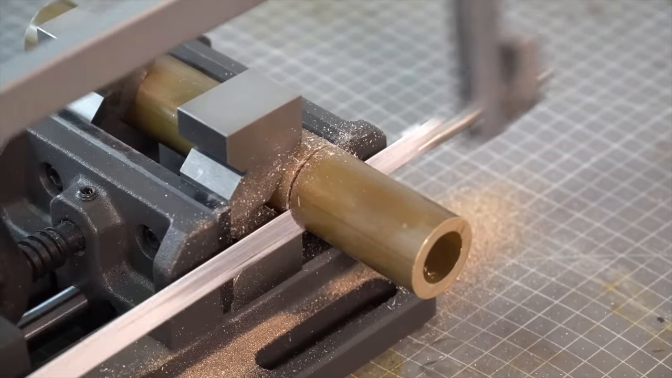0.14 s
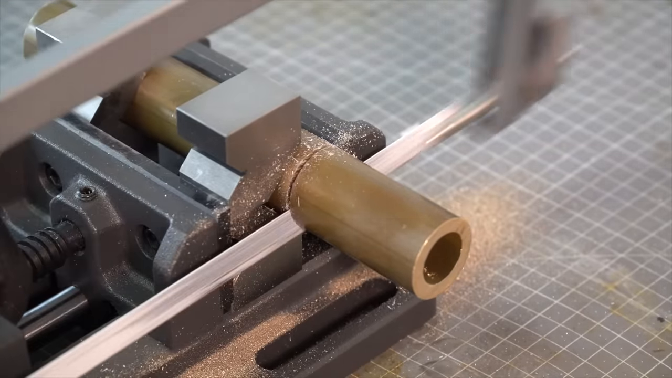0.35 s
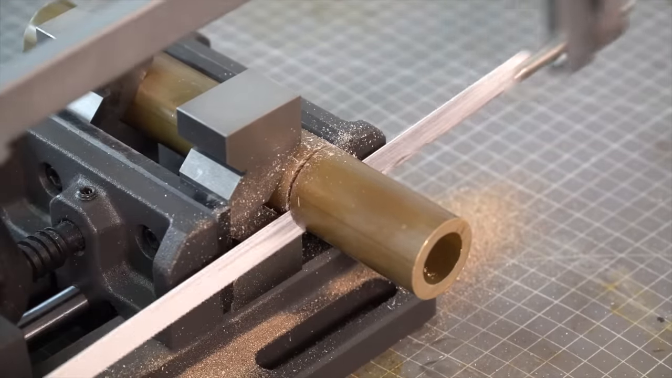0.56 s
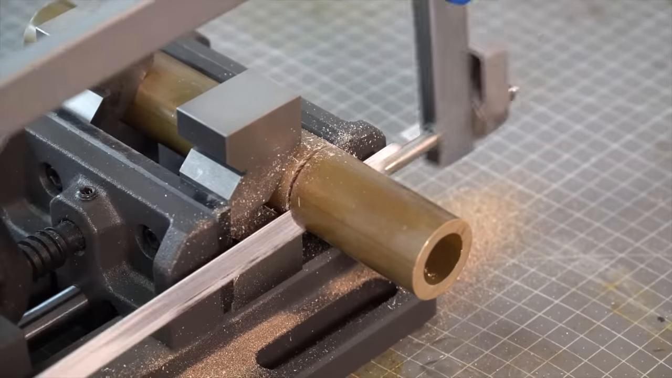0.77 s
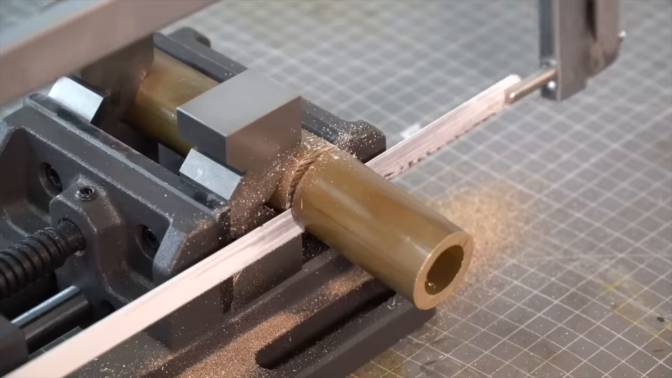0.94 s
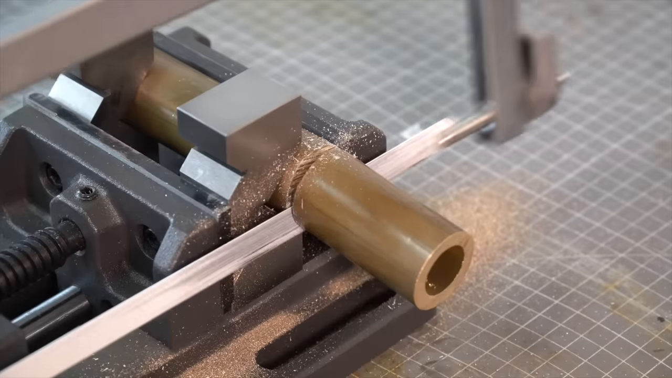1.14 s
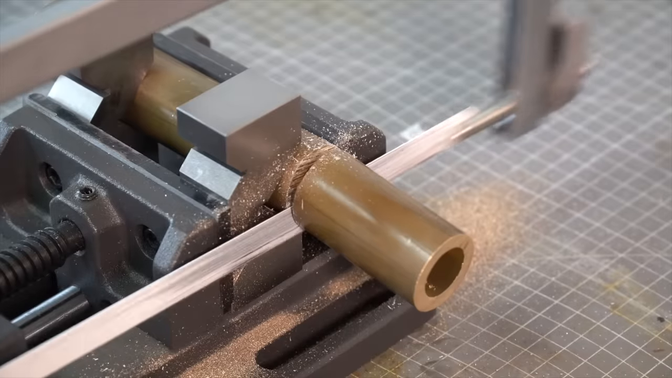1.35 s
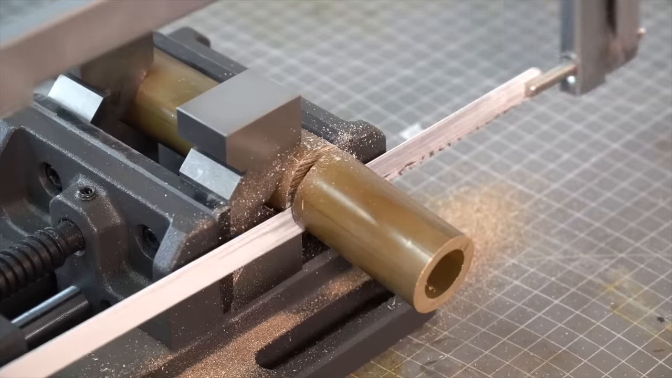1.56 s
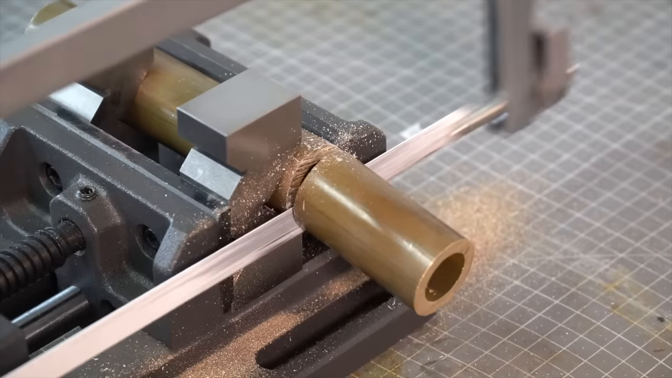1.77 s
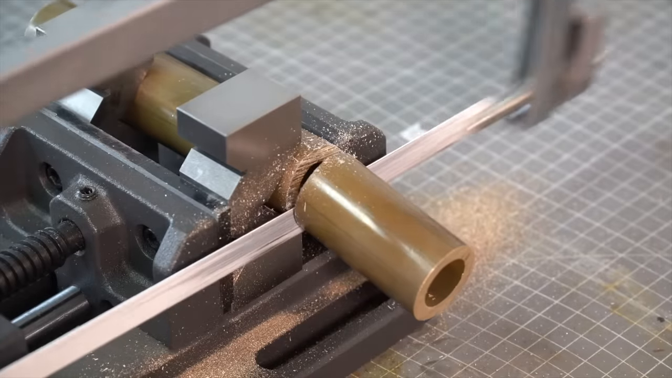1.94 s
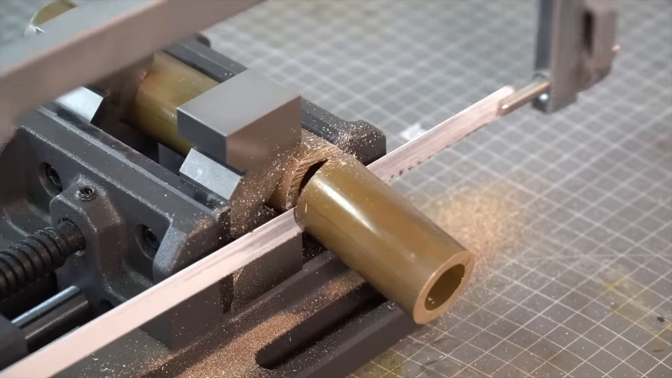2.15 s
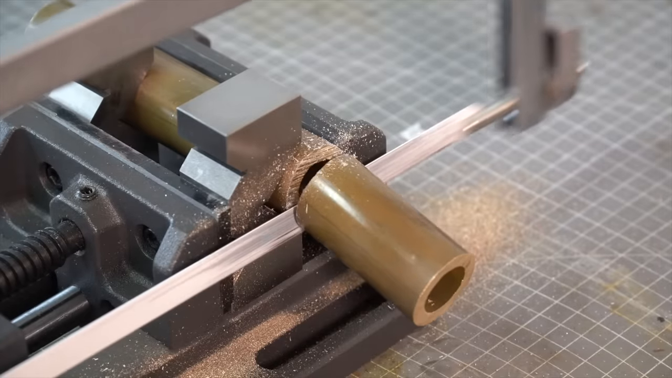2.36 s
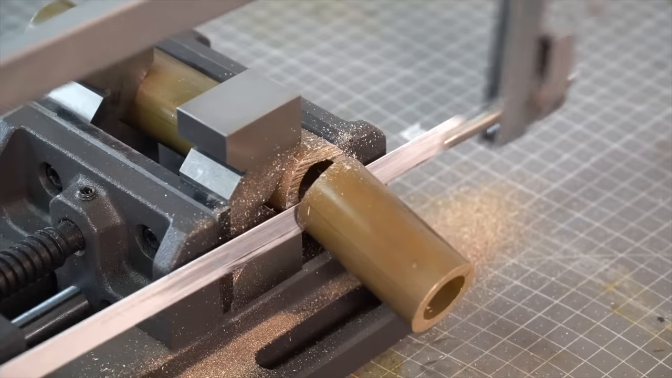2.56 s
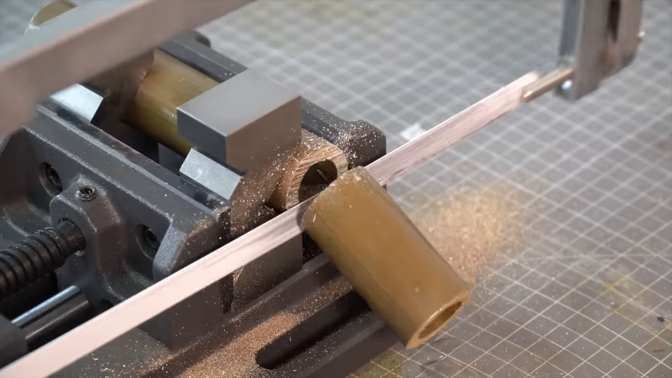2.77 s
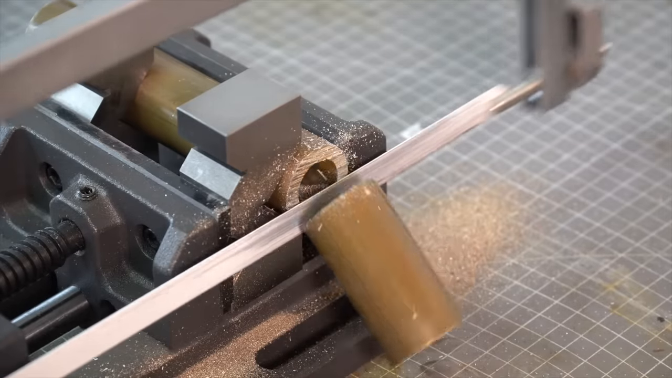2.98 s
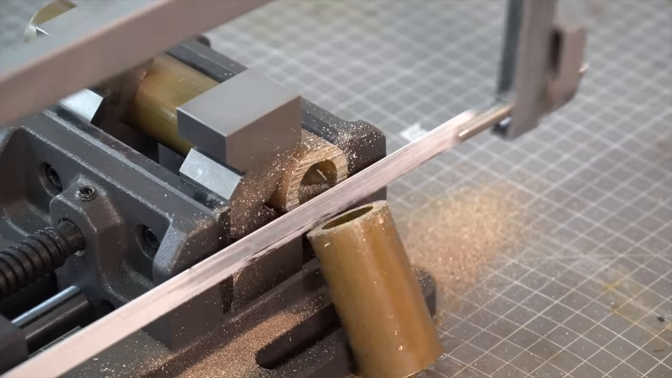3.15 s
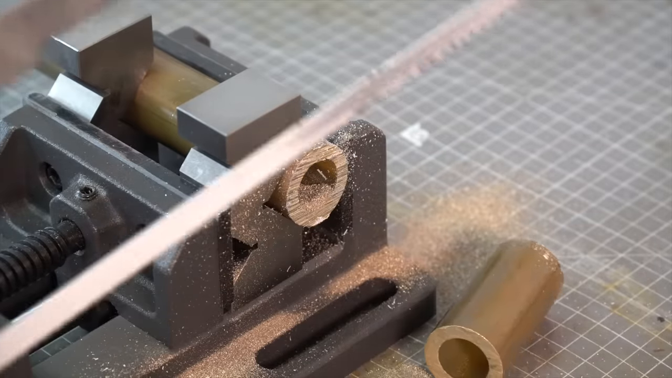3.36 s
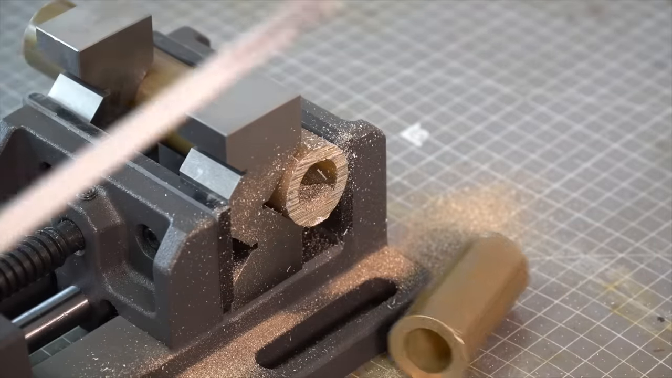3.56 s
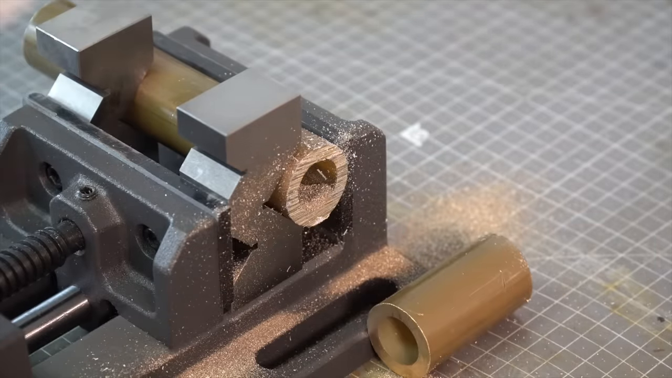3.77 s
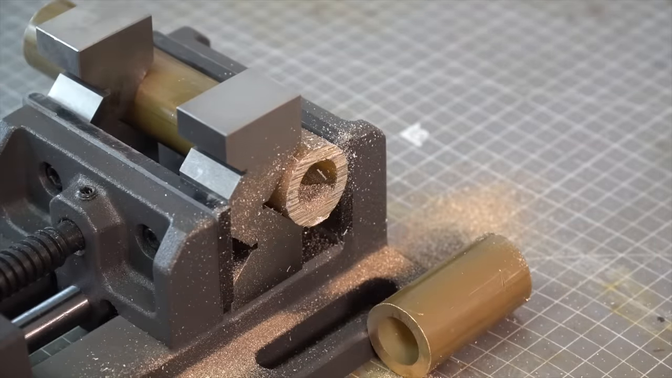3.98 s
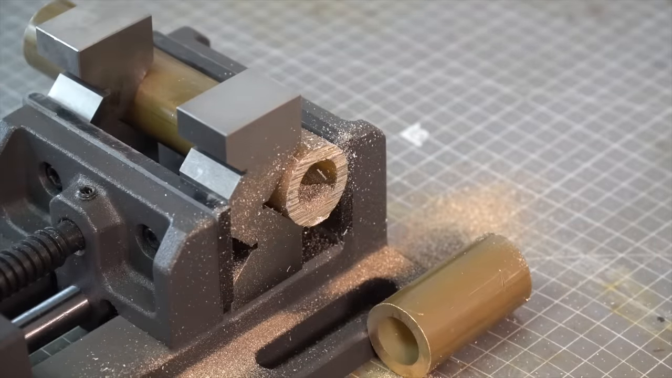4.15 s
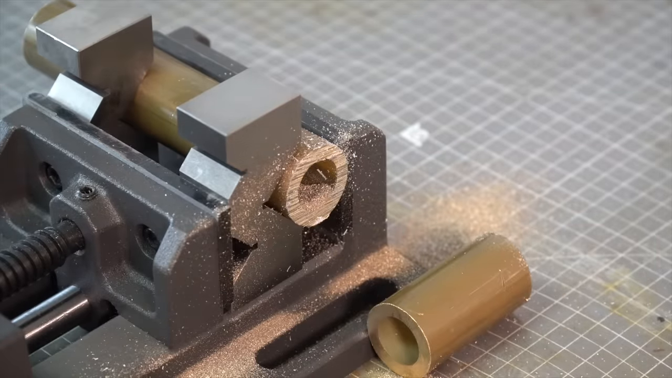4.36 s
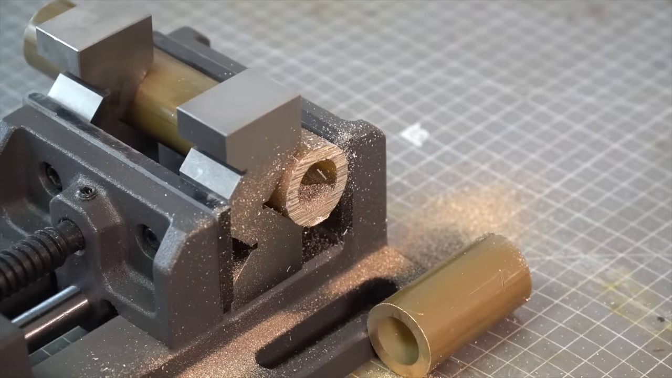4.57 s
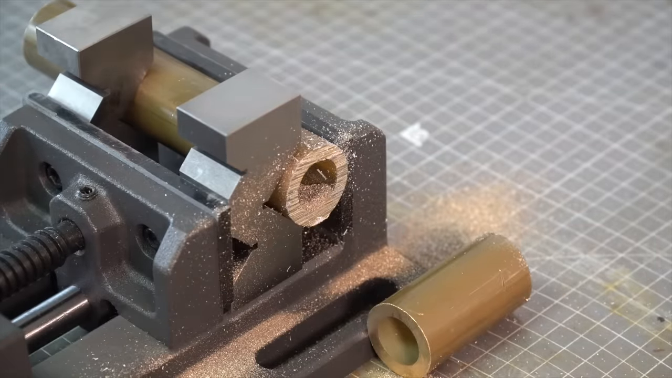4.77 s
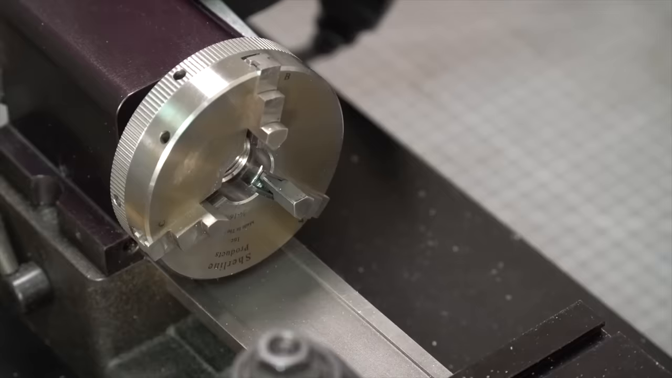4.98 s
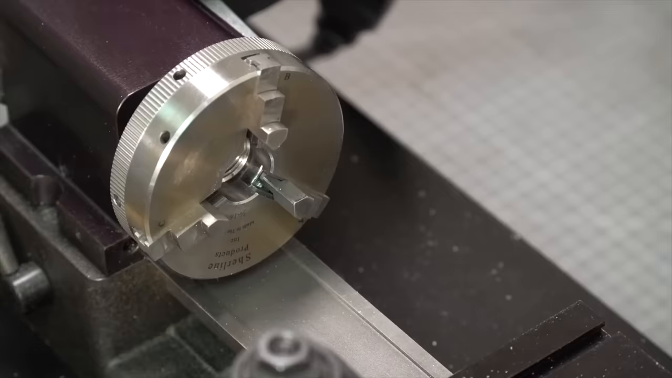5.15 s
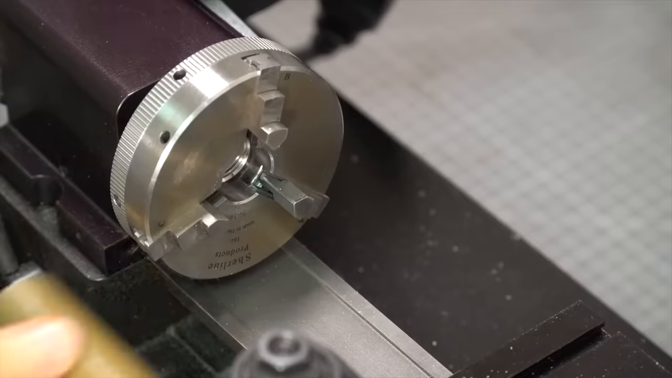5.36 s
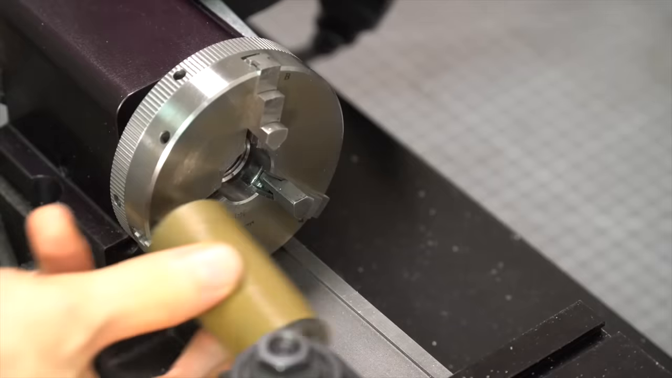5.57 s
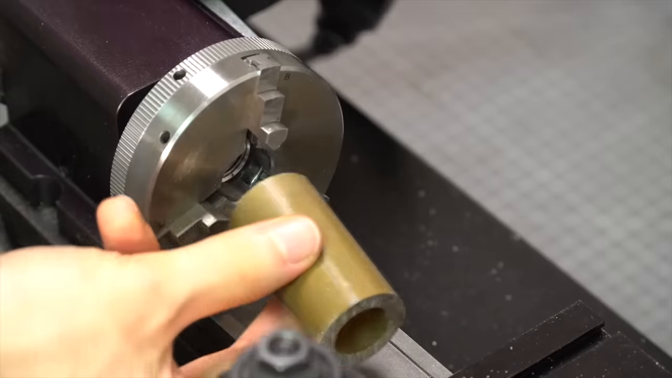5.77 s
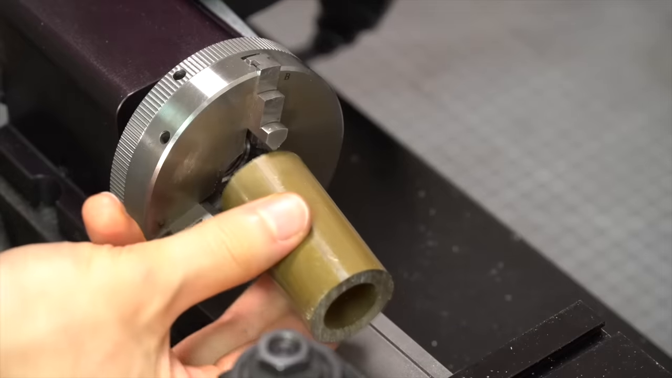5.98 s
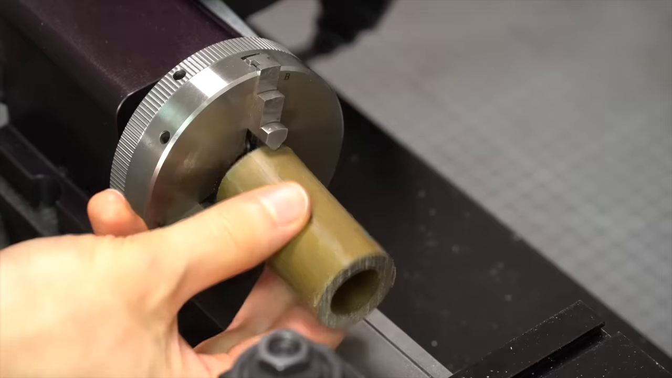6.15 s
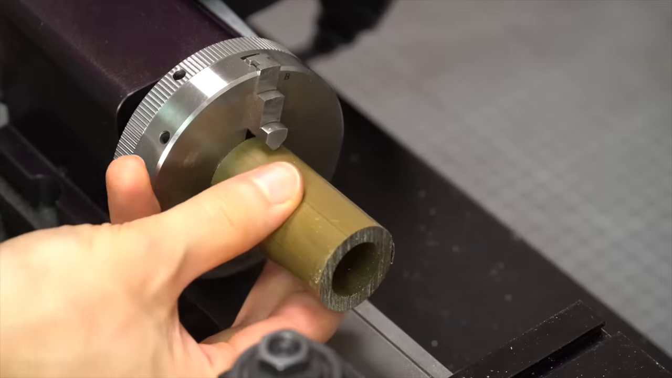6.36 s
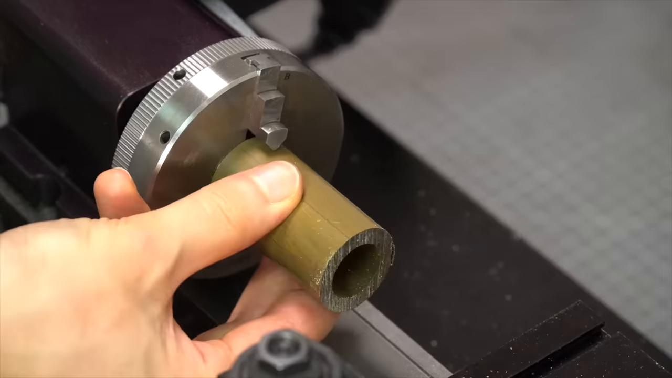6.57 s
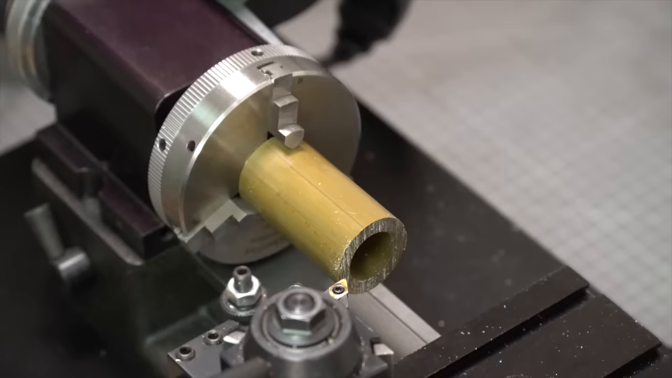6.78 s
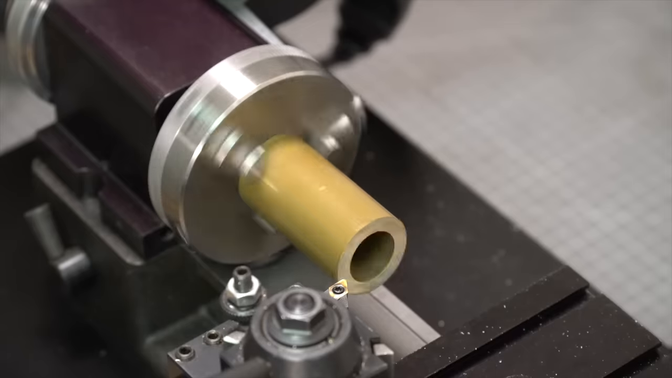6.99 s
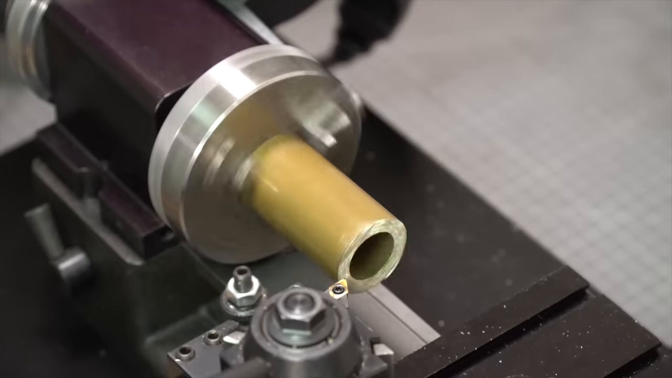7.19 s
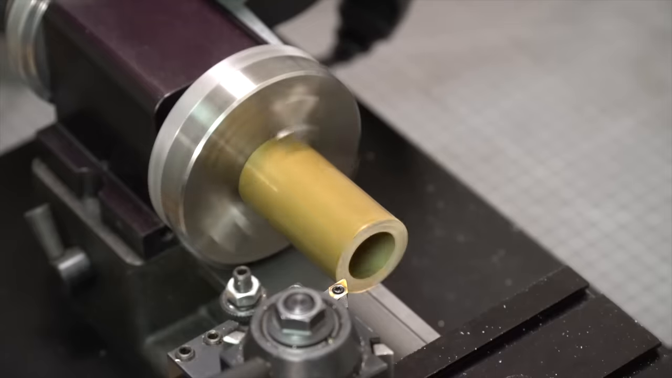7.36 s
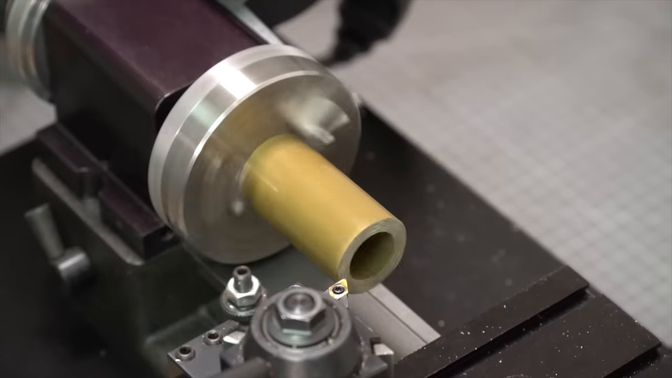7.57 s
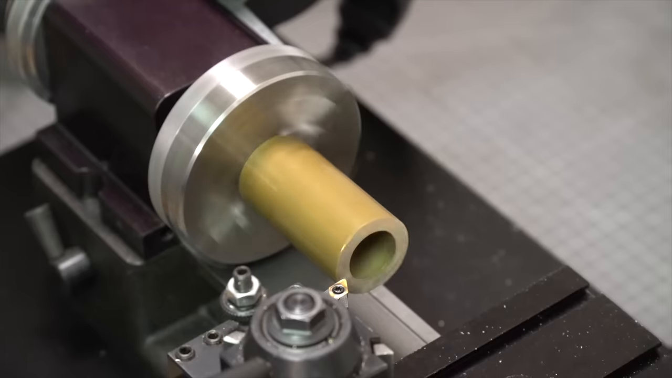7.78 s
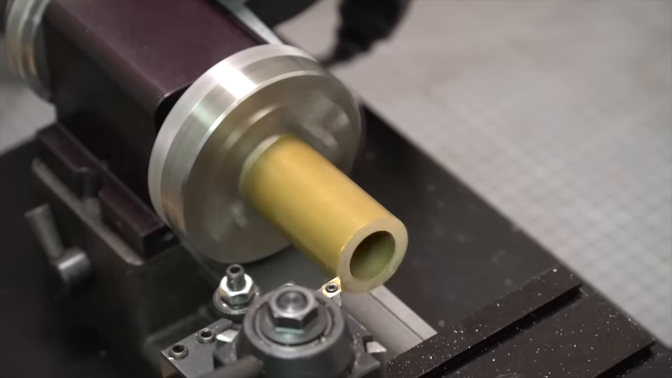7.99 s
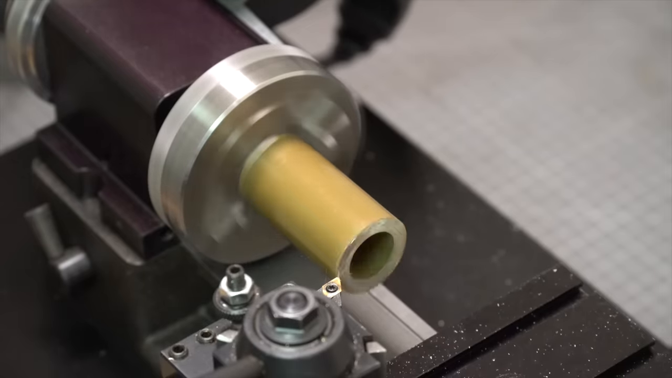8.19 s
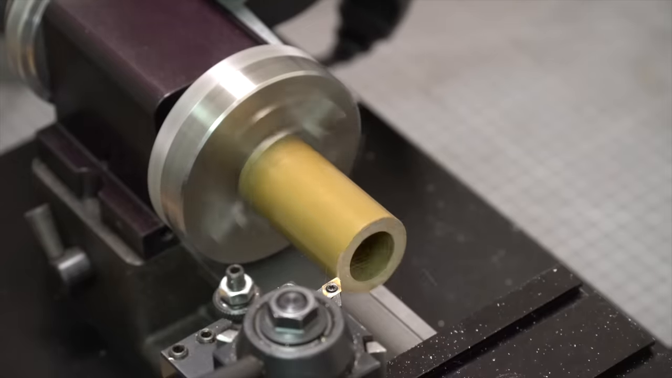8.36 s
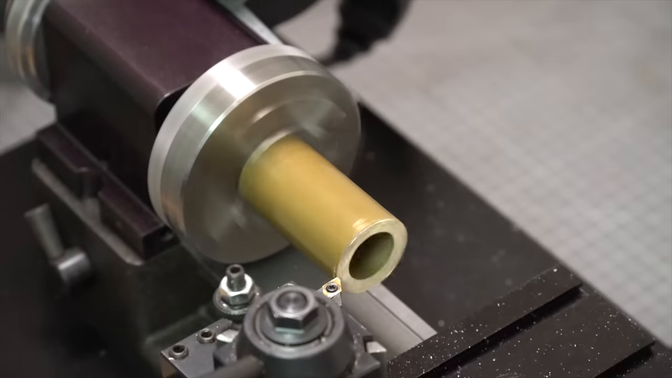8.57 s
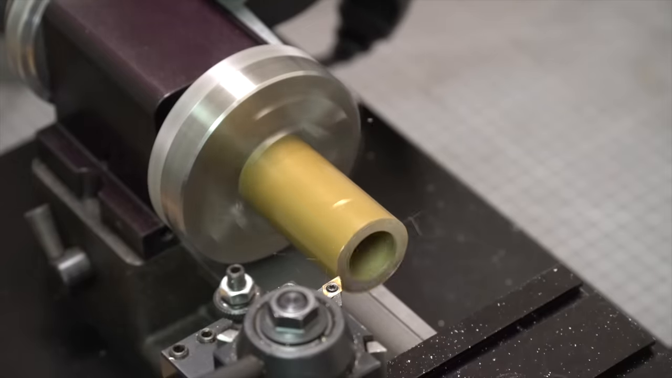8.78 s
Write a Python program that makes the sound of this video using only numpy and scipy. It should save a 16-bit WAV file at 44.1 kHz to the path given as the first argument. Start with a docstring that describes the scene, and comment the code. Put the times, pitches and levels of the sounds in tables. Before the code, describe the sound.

Quick, ringing hacksaw strokes on metal end in a clatter; after a few knocks, a small lathe starts humming and chatters against the tube.

```python
"""Hacksaw and lathe

A hacksaw races through a tube in a vise: the teeth rasp, blade and frame ring, the bench rumbles.
The cut-off piece drops on the bench and is knocked into the chuck, the clamp of a lathe.
The lathe motor starts and hums, then the tool meets the uneven sawn face and takes a chip
once a turn. The workshop is small and fairly dry."""
import sys
import numpy as np
from scipy import signal
from scipy.fft import rfft, irfft
from scipy.io import wavfile
from scipy.ndimage import uniform_filter1d, map_coordinates

SR = 44100
rng = np.random.default_rng(int(sys.argv[2]) if len(sys.argv) > 2 else 0)


def store_pcm(level_fs):
    """Save levels as 16-bit WAV."""
    pcm = np.round(np.clip(level_fs, -1, 1) * 32767).astype(np.int16)
    wavfile.write(sys.argv[1], SR, np.atleast_2d(pcm).T)


N = 389390
T = np.arange(N) / SR
FREQ = np.fft.rfftfreq(N, 1 / SR)

SQUEAK_S, THIN_WALL_S, SAW_STOP_S = .201, 1.2, 3.313  # blade binds, little wall is left, sawing ends
AT_LATHE_S, MOTOR_ON_S, TOUCH_S, FIRST_CUT_S = 4.99, 6.989, 8.066, 8.092
HUM_HZ = 119.99  # the motor's magnetic pulse rate

# saw strokes, return and cut in turn: start t/s, force/dB
STROKES = [(0.041, -33.5), (0.19, -36.2), (0.396, -39.5), (0.545, -35.5), (0.716, -35), (0.88, -38.5),
           (1.083, -39.9), (1.235, -41.5), (1.397, -41.6), (1.544, -40), (1.697, -39.5), (1.845, -37),
           (2.001, -40.5), (2.151, -42), (2.289, -44), (2.426, -41.5), (2.587, -42.5), (2.725, -40),
           (2.885, -41.5), (3.015, -40.5), (3.167, -44.5)]
# parts the teeth shake, by name: level over the force at full speed/dB, loss at standstill/dB,
# extra on a cutting stroke/dB, extra in the thick wall/dB
SAW_PARTS = {"rasp": (3.5, 13, -3.5, 0), "blade": (0.1, 8, 2.1, 0.4), "hiss": (-0.5, 22.5, 2, 3),
             "frame": (1.3, 16, -1.5, -3), "bench": (-13.3, 5, 6, 7)}
# teeth that catch hard: t/s, level/dB, chip hiss relative to that level/dB
CATCHES = [(0.0727, -11, -15), (0.2344, -7, -14.5), (0.344, -12, -29), (0.7465, -11.5, -18),
           (0.8175, -22.5, 2.5), (0.899, -13, -21), (0.944, -24.5, 7.5), (0.9732, -10.5, -11.5),
           (1.329, -21, -9), (1.711, -19, -29), (1.937, -12, -23), (2.6165, -22.5, -13), (2.7422, -23, -12),
           (2.805, -16.5, -6), (3.04, -17, -16), (3.0624, -13.5, -18), (3.2246, -13.5, -11.5)]
# blows of the piece on vise and bench, then on the chuck: t/s, level/dB, tilt/(dB per octave), echo/dB
DROPS = [(3.267, -26, -2, 4.5), (3.276, -26, -2.5, -2), (3.641, -48.5, -1, 2.5), (3.652, -41.5, 4, -4),
         (3.723, -17.5, -0.5, 1), (3.815, -37, -0.5, 5), (3.996, -62, 10.5, 12)]
KNOCKS = [(6.09, -41, -6.5, -1), (6.105, -34.5, -5.5, 2), (6.116, -36.5, -4.5, -9),
          (6.127, -35.5, -8.5, 1.5), (6.308, -45.5, -8, 5.5), (6.345, -24.5, -1.5, 0),
          (6.409, -36.5, -6, -0.5), (6.515, -31, -6.5, -4)]
# ringing tones of tube and vise: f/Hz, level/dB, t60/s (the time to fade by 60 dB)
TUBE_RING = [(14100, -35, 1), (14040, -32, .65)]
VISE_RING = [(558, -39.5, 0.55), (346, -48, 0.75)]
# small ticks and pings: t/s, level/dB, f/Hz, width/Hz, t60/s
TICKS = [(4.842, -54, 7800, 2020, 0.033), (6.345, -27, 1700, 330, 0.046),
         (6.728, -45.5, 2000, 9000, 0.0058), (7.025, -46.5, 2990, 90, 0.23),
         (8.065, -24.5, 2800, 9000, 0.0077), (8.066, -28.5, 1300, 160, 0.088)]
# slips of a chip as it breaks away: t/s after contact, level/dB
SLIPS = [(0.0146, -0.5), (0.0177, -8), (.0225, 0.5)]
# motor hum: multiple of HUM_HZ, level/dB
HUM = [(1, -53), (2, -60), (3, -39.5), (4, -21), (5, -45.5), (6, -48.5), (7, -57.5), (24, -69), (25, -51.5),
       (26, -55.5), (28, -65), (30, -69), (34, -65), (36, -70)]
# surges of the bearing hiss: t/s, level/dB
BEARING_SURGES = [(7.0, -61.5), (7.15, -53.5), (7.416, -59.5), (7.476, -58.5), (7.486, -50.5),
                  (7.72, -58.5), (7.776, -51.5), (7.926, -57), (8.04, -51.5)]

# modes, the pitches at which each thing likes to ring: f/Hz, width/Hz, level/dB
FRAME_MODES = [(996.3, 38, 0), (1556, 29, -10.5), (1873, 64, -16), (2370, 31, -15.5), (2884, 98, -17),
               (3366, 110, -14.5)]
BLADE_MODES = [(5550, 200, 1), (6430, 160, 0.5), (6790, 200, 0), (7537, 1800, -2), (8236, 910, -14.5),
               (8530, 140, -17.5), (9230, 140, -6)]
CHIP_MODES = [(10250, 310, -10.5), (11250, 440, -5), (12470, 1300, 4), (13010, 680, -13), (13380, 500, 2.5),
              (14750, 250, -11.5)]
BENCH_MODES = [(145.4, 14, 8.5), (230.3, 24, 6.5), (357.3, 63, -1.5), (427, 87, 2), (617, 220, -2.5),
               (817, 290, -5)]
OFFCUT_MODES = [(106.7, 110, -14.5), (328, 22, -8), (449, 100, -4), (594, 65, -3.5), (675, 64, -4.5),
                (880, 165, -5), (1030, 52, -2.5), (1156, 60, -1), (1228, 24, -0.5), (1360, 170, -6.5),
                (1890, 210, -11.5), (2360, 100, -3.5), (3350, 820, -18), (6300, 180, -25.5)]
CHUCK_MODES = [(479, 31, 1.5), (616, 81, 1.5), (770, 88, 2.5), (908, 94, -6.5), (1182, 120, -4),
               (1690, 310, -5.5), (2830, 410, -11.5), (4800, 460, -18.5)]
LATHE_MODES = [(352, 35, 2), (465, 60, 2.5), (519, 31, 10.5), (597, 18, 2.5), (757, 52, 2), (970, 38, -6),
               (1128, 27, 3.5), (1260, 150, -8), (1620, 180, -8.5), (1847, 106, -7.5), (2880, 210, -17.5),
               (4140, 440, -21.5)]
TOOL_MODES = [(1246, 410, 9.5), (1710, 260, 7.5), (4100, 1400, -6.5)]
HOUSING_MODES = [(130, 50, -7), (497, 80, 2.5), (742, 46, 1.5), (1390, 26, -2), (2944, 81, -7),
                 (4240, 300, -29)]

# spectra, how strong each noise is from low to high: f/Hz, level/dB
RASP = [(150, -25), (700, 0), (1300, -2.5), (2200, 0), (3300, 1), (4100, 1), (5200, -2), (9000, -4.5),
        (15500, -15)]
SCRAPE = [(100, 11), (400, 19.5), (1800, -7), (2400, 9.5), (3500, 1), (4200, 4.5), (5200, -3), (6100, 1.5),
          (8600, 0), (10000, -10.5), (13000, -9), (14400, -17), (15500, -15)]
SLEEVE = [(300, -8.5), (900, -3), (1600, 0), (3000, -5.5), (6000, -9), (9000, -10.5), (11000, -16),
          (15500, -25.5)]
THUD = [(30, -17.5), (80, -2.5), (160, -6.5), (260, -16)]
BEARING_HISS = [(100, -8), (1000, -6.5), (4400, -5.5), (8500, -5.5), (10000, -13), (13500, -12.5),
                (15500, -19)]
RUMBLE = [(8, -6.5), (25, -9), (47, -4), (62, -10), (110, -27), (400, -76)]
AIR = [(20, -6.5), (50, 11), (85, -8.5), (140, -3), (220, 0), (320, -6), (700, -9.5), (1300, -13),
       (2000, -16), (3300, -22.5), (8500, -24), (15500, -34)]


def saw():
    """The blade speeds up and slows down in each stroke; its teeth shake blade, frame and bench."""
    start, fastest, force_db = strokes()
    marks = np.append(np.column_stack([start, fastest]), SAW_STOP_S + .072)
    swing = np.pi / 2 * np.interp(T, marks, np.arange(len(marks)))
    speed = np.abs(np.sin(swing))
    force = undb(np.interp(T, fastest, force_db))
    cutting = np.interp(T, fastest, np.arange(len(start)) % 2)
    thick = np.interp(T, fastest, fastest < THIN_WALL_S)
    gain = {part: undb(db - rest_db * (1 - speed) ** 1.5 + cut_db * cutting + thick_db * thick)
            for part, (db, rest_db, cut_db, thick_db) in SAW_PARTS.items()}
    grit = teeth(speed)
    # the free length of the blade changes as it travels, so its pitches wander
    travel = .025 * np.cos(swing) + .012 * wander(30)
    rasp = colour(grit, RASP) * gain["rasp"]
    blade = bend(resonate(grit, BLADE_MODES), travel) * gain["blade"]
    hiss = bend(resonate(grit, CHIP_MODES), travel / 2) * gain["hiss"]
    frame = bend(resonate(grit, FRAME_MODES), travel / 2) * gain["frame"] * undb(2.2 * wander(35))
    bench = resonate(grit, BENCH_MODES) * gain["bench"]
    return force * (rasp + blade + hiss + frame + bench) + bench_sway(speed, thick)


def strokes():
    """Start, fastest moment (halfway through) and force in dB of every stroke."""
    start, force_db = np.transpose(STROKES)
    return start, start + .5 * np.diff(start, append=SAW_STOP_S), force_db


def teeth(speed):
    """Each passing tooth tears off a chip: a short burst of friction noise."""
    tooth_hz = 803.3 * (speed + .15)
    since_tooth = (np.cumsum(tooth_hz) / SR) % 1  # runs from 0 to 1 between teeth
    return noise() * np.exp(-since_tooth / .64) * undb(2 * wander(130))


def catches():
    """A snagged tooth jolts the blade: it rings and hisses, with a rough zing and a brief squeal."""
    ring, hiss, zing, squeal = np.zeros((4, N))
    t = T[:SR // 8]
    shape = decay(t, t60=.06) * np.tanh(t / .002)
    _, fastest, force_db = strokes()
    # lesser snags come near the fastest moment of each stroke
    snags = [(s + rng.normal(0, .025), db + rng.normal(14, 2.5), -9) for s, db in zip(fastest, force_db)]
    for s, db, hiss_db in snags + list(CATCHES):
        add(ring, s, undb(db) * shape)
        add(hiss, s, undb(db + hiss_db) * shape)
        # the zing falls because bending waves bring the highs first
        zing_hz = 7200 * np.exp(rng.normal(0, .092)) / (1 + t / .023)
        add(zing, s, undb(db) * shape * decay(t, t60=.052) * np.sin(phase_of(zing_hz)))
        squeal_hz = 6510 * rng.normal(1, .022)
        squeal_shape = decay(t, t60=.2) * np.tanh(t / .026)
        add(squeal, s, undb(db) * squeal_shape * np.sin(2 * np.pi * squeal_hz * t))
    tones = undb(-9.5) * zing * wander(1400) + undb(-10.5) * squeal * wander(220)
    return undb(-9) * ring * resonate(noise(), BLADE_MODES) + hiss * resonate(noise(), CHIP_MODES) + tones


def squeak():
    """The blade binds once, sticking and slipping in step with the saw frame's lowest mode."""
    phase = phase_of(985 * (1 + .0074 * wander(150)))
    level = undb(-14.5) * envelope(T - SQUEAK_S, attack_s=.0081, hold_s=.008, t60=.11)
    return level * unit(np.sin(phase) + undb(-19) * np.sin(2 * phase))


def bench_sway(speed, thick):
    """The bench shudders at a pitch that follows the saw's speed, and jolts when the blade binds."""
    shudder = np.sin(phase_of(74 + 28 * speed + 8 * wander(60))) * undb(2 * wander(50))
    thud = colour(noise(), THUD)
    easing_db = 5 * np.maximum(T - THIN_WALL_S, 0)  # the cut gets easier
    steady = undb(-44 + 3 * (speed - .5) - 6.5 * thick - easing_db)
    jolt = undb(-36.5) * swell(T - SQUEAK_S - .025, width_s=.063)
    return (unit(shudder) + .5 * thud) * (steady + jolt)


def offcut():
    """The cut piece tumbles off the vise, which rings on, and then lands on the bench."""
    tumble_rows = [row for row in DROPS if row[0] < SAW_STOP_S]
    landing_rows = [row for row in DROPS if row[0] >= SAW_STOP_S]
    tumble, landing = (blows(rows, OFFCUT_MODES, crack_t60=.033, rise_s=.0024, tail_db=-1.5,
                             tail_t60=.44, treble_t60=.28, ring_db=-6)
                       for rows in (tumble_rows, landing_rows))
    # the sound cuts off abruptly here, together with the sawing
    cut_off = np.where(T < SAW_STOP_S, 1, undb(-17))
    since = T - tumble_rows[-1][0]
    vise = sum(undb(db) * np.sin(2 * np.pi * hz * since) * decay(since, t60) for hz, db, t60 in VISE_RING)
    return tumble * cut_off + vise + landing


def chuck_knocks():
    """The tube knocks against the jaws of the chuck."""
    return blows(KNOCKS, CHUCK_MODES, crack_t60=.066, rise_s=.0018, tail_db=-2,
                 tail_t60=.36, treble_t60=.31, ring_db=-20)


def blows(rows, modes, crack_t60, rise_s, tail_db, tail_t60, treble_t60, ring_db):
    """Each blow cracks through the body's modes, dies away in the room and leaves the tube ringing."""
    out, t = np.zeros(N), T[:SR]
    body = resonate(noise(), modes)
    octaves = np.log2(np.clip(np.fft.rfftfreq(SR, 1 / SR), 300, 7000) / 1000)
    low_pass = signal.butter(4, 1400, fs=SR, output="sos")
    ring = sum(undb(ring_db + db) * np.sin(2 * np.pi * hz * t) * decay(t, t60)
               for hz, db, t60 in TUBE_RING)
    for (s, db, tilt_db, room_db), at in zip(rows, rng.integers(0, N - SR, len(rows))):
        tone = unit(irfft(rfft(body[at:at + SR]) * undb(tilt_db * octaves), SR))
        low = signal.sosfiltfilt(low_pass, tone)
        high = (tone - low) * np.tanh(4 * t / rise_s)
        low = low * np.tanh(t / rise_s)  # the heavy low modes build up more slowly
        crack = low * decay(t, crack_t60) + undb(3) * high * decay(t, crack_t60 / 2)
        tail = low * decay(t, tail_t60) + undb(-7.5) * high * decay(t, treble_t60)
        add(out, s, undb(db) * (crack + undb(tail_db + room_db) * tail + ring))
    return out


def lathe_cut(turn_s=.078, feed_db_per_s=5):
    """Once a turn the tool scrapes the high side of the face; the chip slips and shakes the lathe."""
    cut_time = T - FIRST_CUT_S
    since = cut_time % turn_s
    touching = T > TOUCH_S
    contact = undb(-2 + feed_db_per_s * cut_time) * touching  # louder as the tool is fed deeper
    # light rubbing goes on between cuts; the push peaks as the chip breaks
    scraping = undb(-22) + undb(-2) * envelope(since, attack_s=.00051, hold_s=.018, t60=.082)
    pushing = undb(-10.5) + undb(-4) * envelope(since, attack_s=.0013, hold_s=.023, t60=.036)
    pushing += undb(-1.5) * swell(since - .015, width_s=.0093)
    chips = noise() * undb(4.5 * wander(700))
    slips = np.zeros(N)
    for s in np.arange(FIRST_CUT_S, T[-1], turn_s):
        db = -2 + feed_db_per_s * (s - FIRST_CUT_S)
        for lag_s, slip_db in SLIPS:
            add(slips, s + rng.normal(lag_s, .0004), undb([db + rng.normal(slip_db, 1.25)]))
    rub = resonate(chips * contact * pushing, LATHE_MODES)
    body = (undb(-37) * rub + undb(-40.5) * resonate(slips, LATHE_MODES)) * touching
    # each slip also snaps in the tool itself
    snap = signal.fftconvolve(slips, decay(T[:SR // 20], t60=.015))[:N] * resonate(noise(), TOOL_MODES)
    edge = colour(chips, SCRAPE) + undb(-19) * resonate(chips, [(14250, 110, 0)])
    return body + undb(-20.5) * snap + undb(-29 - 1.5 * cut_time) * edge * contact * scraping


def motor():
    """Magnetic hum, its fourth multiple lifted by the housing, over whirring bearings."""
    phase = 2 * np.pi * HUM_HZ * T + .006 * wander(25)
    hum = sum(undb(db) * np.sqrt(2) * np.sin(k * phase + rng.uniform(0, 2 * np.pi)) for k, db in HUM)
    housing = undb(-49.5) * resonate(noise(), HOUSING_MODES)
    surges = undb(np.interp(T, *np.transpose(BEARING_SURGES)) + 3.5)
    bearings = surges * colour(noise(), BEARING_HISS)
    return undb(-.28) * motor_fade_in() * (hum + housing + bearings)


def motor_fade_in(rise_s=.031):
    """Gain that rises from 0 to 1 after the motor is switched on."""
    return 1 - np.exp(-np.maximum(T - MOTOR_ON_S, 0) / rise_s)


def spin_up(shaft_hz=181, climb_s=.95):
    """The starting current thumps, then a soft tone climbs with the speed of the drive."""
    since = T - MOTOR_ON_S
    speed = np.sin(np.pi / 2 * np.clip(since / climb_s, 0, 1))
    tone = undb(-56.5) * speed ** 3 * np.sin(phase_of(shaft_hz * speed))
    thump = undb(-44) * envelope(since, attack_s=.039, hold_s=.033, t60=.39)
    return np.sqrt(2) * (tone + thump * np.sin(2 * np.pi * HUM_HZ * T))


def ticks():
    """Light clicks and pings, each a quickly fading band of noise."""
    return sum(undb(db) * decay(T - s, t60) * np.tanh((T - s) * hz) * resonate(noise(), [(hz, width, 0)])
               for s, db, hz, width, t60 in TICKS)


def rumble():
    """The room's own low rumble, plus saw, motor and cut shaking the bench."""
    _, fastest, force_db = strokes()
    room = undb(np.where(T < AT_LATHE_S, -62, -67.5))
    sawing = undb(np.interp(T, fastest, force_db) - 9) * decay(np.maximum(T - SAW_STOP_S, 0), t60=5.3)
    running = undb(-59) * motor_fade_in()
    cutting = undb(-46.5) * np.clip((T - TOUCH_S) / .51, 0, 1)
    return np.linalg.norm([room, sawing, running, cutting], axis=0) * colour(noise(), RUMBLE)


def background():
    """Room air, the swish of a sleeve as an arm reaches in, and a thin whine by the idle lathe."""
    air = undb(np.where(T < AT_LATHE_S, -61.5, -65)) * colour(noise(), AIR)
    reach = swell(T - 5.43, width_s=.32) * (T > AT_LATHE_S)
    sleeve = reach * colour(noise(), SLEEVE) * undb(-59.5 + .7 * wander(41))
    whine = undb(-80.5) * swell(T - 5.9, width_s=.9) * resonate(noise(), [(8120, 90, 0)])
    return air + sleeve + whine


def workshop(x, wet_db, t60):
    """Add the dense echoes from bench and walls."""
    t = T[:SR // 2]
    tail = noise()[:len(t)] * decay(t, t60) * (t > .002)
    return x + undb(wet_db) * signal.fftconvolve(x, tail / np.linalg.norm(tail))[:N]


def undb(db):
    """Turn decibels into a gain."""
    return 10 ** (np.asarray(db) / 20)


def unit(x):
    """Scale x to an average strength (rms) of 1."""
    return x / np.sqrt(np.mean(x ** 2))


def noise():
    """White noise."""
    return rng.standard_normal(N)


def wander(rate):
    """A random curve that glides to a new value `rate` times a second; spread near 1."""
    step = int(SR / rate)
    return 1.3 * uniform_filter1d(np.repeat(noise()[:N // step + 1], step), step)[:N]


def colour(x, points):
    """Shape x with a spectrum of (Hz, dB) points; rms 1."""
    hz, db = np.transpose(points)
    gain = undb(np.interp(np.log(FREQ + 1), np.log(hz), db))
    return unit(irfft(rfft(x) * gain, N))


def resonate(x, modes):
    """Let x ring through modes that pass little outside their own band; rms 1."""
    response = 0
    for hz, width, db in modes:
        band = 1 / (1 + 1j * (FREQ ** 2 - hz ** 2) / (1.55 * width * FREQ + 1e-9))
        response = response + undb(db) * band ** 2
    return unit(irfft(rfft(x) * response, N))


def bend(x, stretch):
    """Shift all pitches of x by the small, changing fraction `stretch`."""
    return map_coordinates(x, [np.arange(N) + np.cumsum(stretch)], order=3, mode="wrap")


def phase_of(hz):
    """The running angle of a tone whose pitch changes."""
    return 2 * np.pi * np.cumsum(hz) / SR


def decay(t, t60):
    """Start at t = 0 and fade by 60 dB every t60 seconds."""
    return (t >= 0) * np.exp(-np.log(1000) * np.maximum(t, 0) / t60)


def envelope(t, attack_s, hold_s, t60):
    """Rise in a straight line from t = 0, hold, then fade."""
    return np.clip(t / attack_s, 0, 1) * decay(np.maximum(t - attack_s - hold_s, 0), t60)


def swell(t, width_s):
    """Bell-shaped gain around t = 0."""
    return np.exp(-(t / width_s) ** 2)


def add(out, s, sound):
    """Mix a sound into out, starting at s seconds."""
    i = max(int(s * SR), 0)
    out[i:i + len(sound)] += sound[:N - i]


def scene():
    """Sawing, the falling piece, knocks on the chuck and the lathe at work, in one channel."""
    sawing = workshop(saw() + catches(), wet_db=-6.5, t60=.21) + squeak()
    sawing *= T < SAW_STOP_S
    handling = offcut() + chuck_knocks() + ticks()
    lathe = workshop(lathe_cut(), wet_db=-8.5, t60=.39) + motor() + spin_up()
    return (sawing + handling + lathe + rumble() + background())[None]


def record(dry):
    """Cut the very highest treble, above 15750 Hz."""
    return signal.sosfilt(signal.ellip(10, .2, 70, 15750, fs=SR, output="sos"), dry)


dry = scene()
out = record(dry)
store_pcm(out)
```